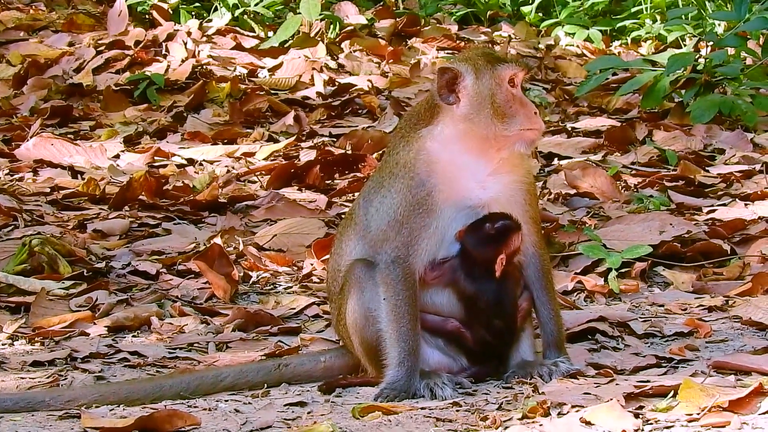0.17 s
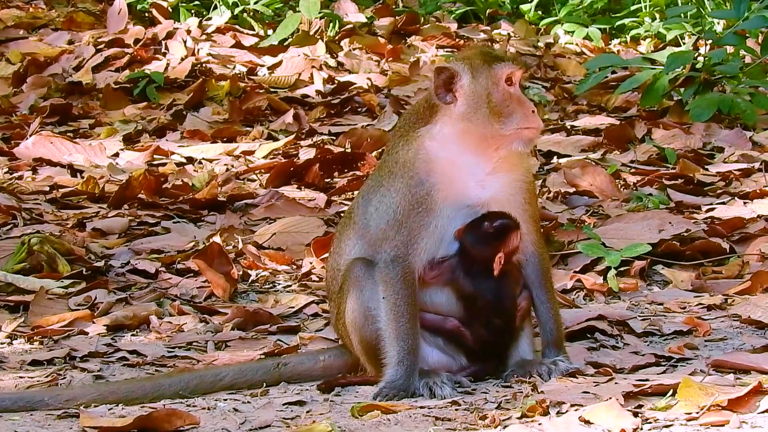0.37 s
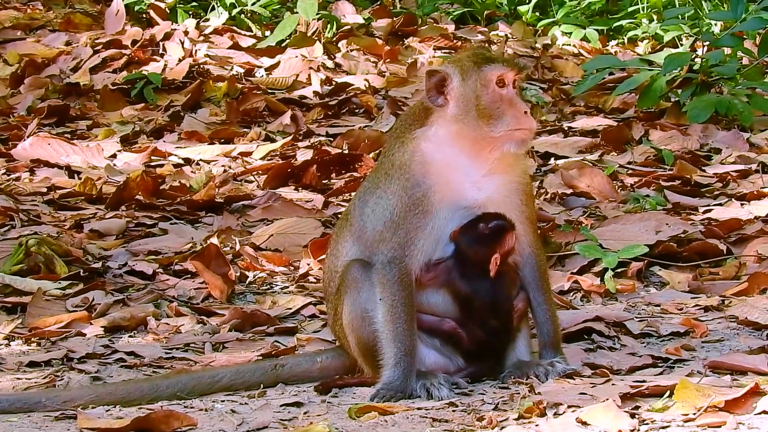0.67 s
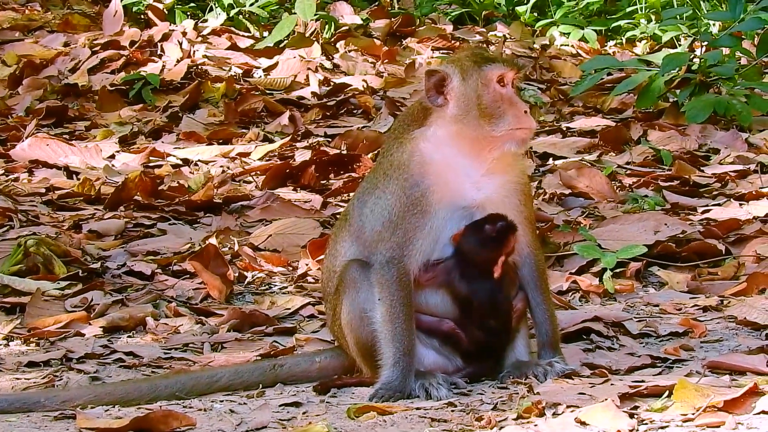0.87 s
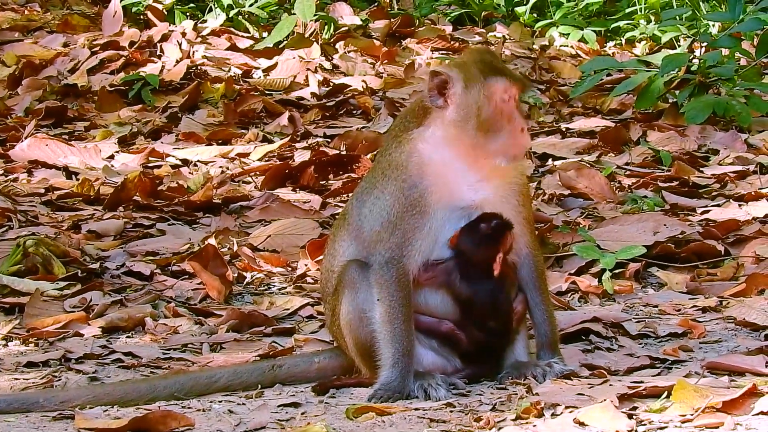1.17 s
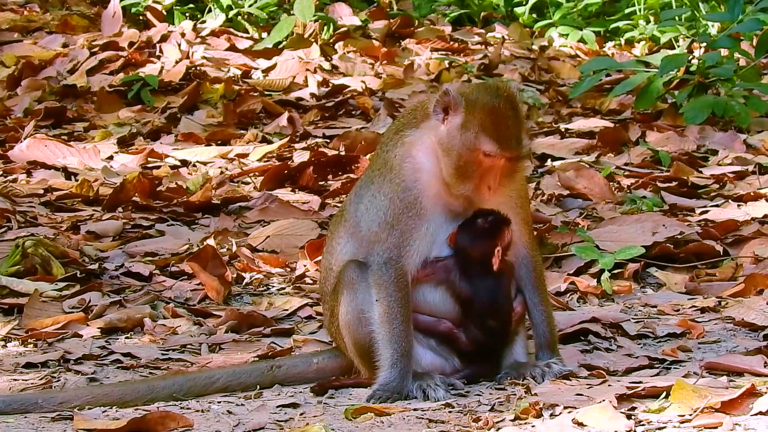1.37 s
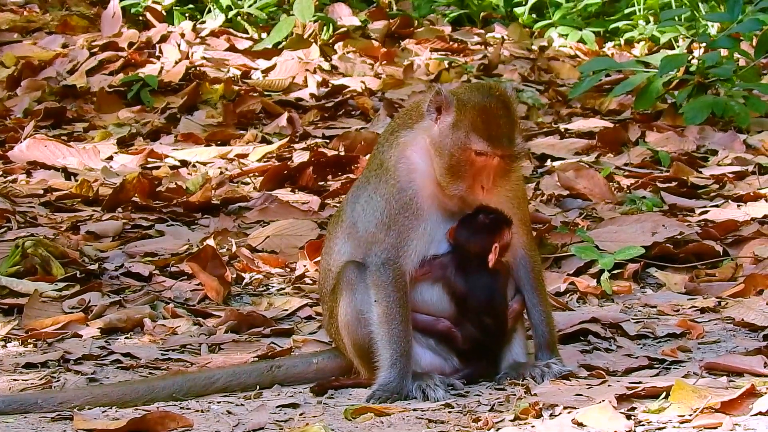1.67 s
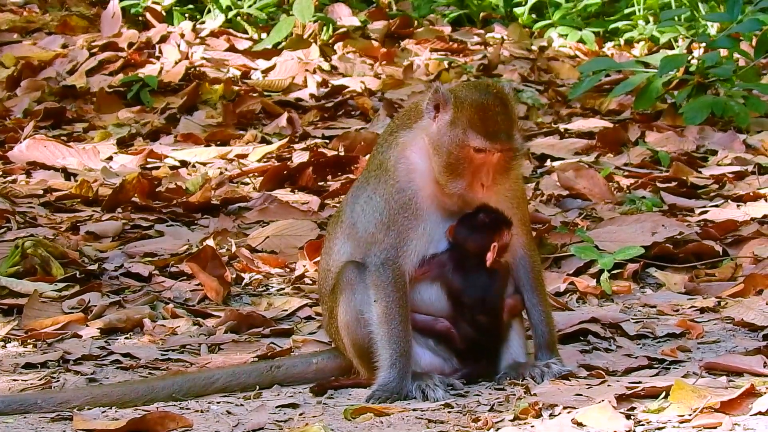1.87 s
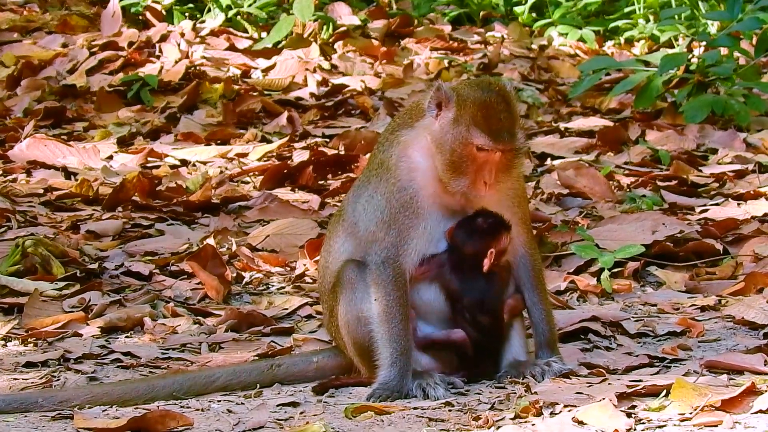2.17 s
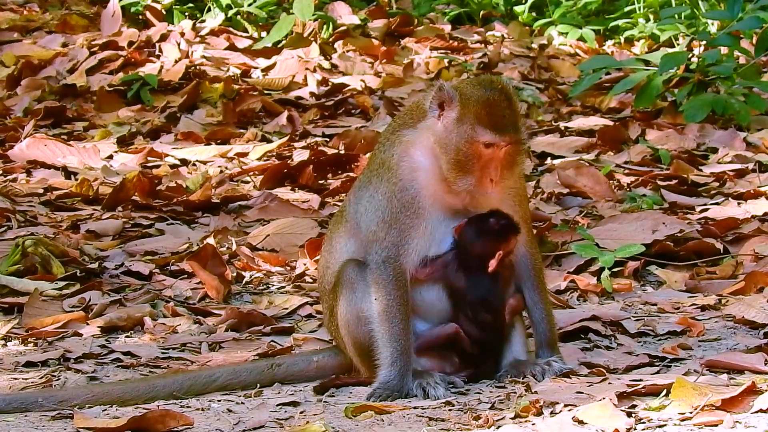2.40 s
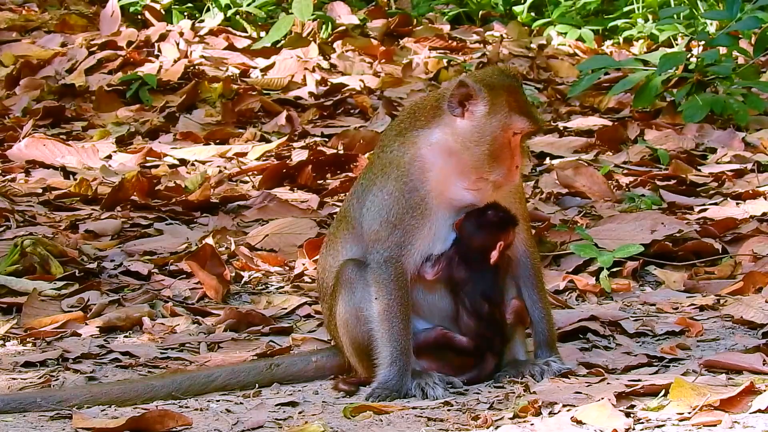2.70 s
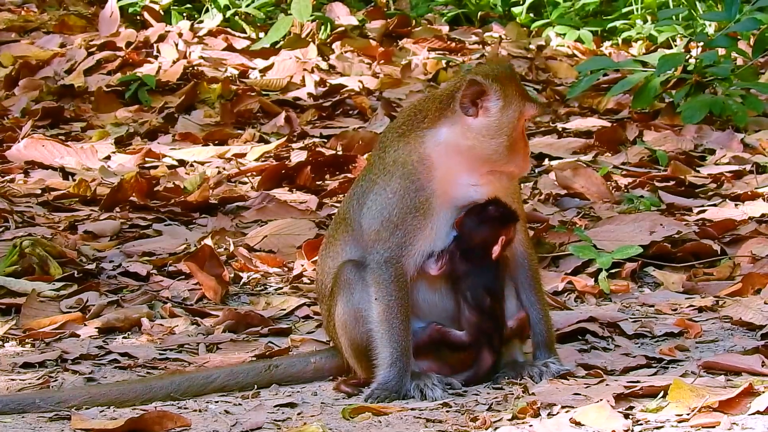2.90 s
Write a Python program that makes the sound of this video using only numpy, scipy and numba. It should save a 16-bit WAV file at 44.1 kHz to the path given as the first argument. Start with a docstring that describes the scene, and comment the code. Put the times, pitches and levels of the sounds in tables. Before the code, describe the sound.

Cicadas sing a steady, high, buzzing chorus at a forest edge as a vehicle slowly nears.

```python
"""At a forest edge, a cicada chorus sings: near singers around one pitch, far ones spread a little below it.
Each singer repeats one stored drum cycle; a faint cricket is wing clicks ringing one resonance.
A distant one-cylinder engine idles as single firings through a pipe; a vehicle of shaped noise nears on the left.
Dry leaves tick as short noise cracks, soft falling sine tones hum now and then, and quiet noise is the air."""
import sys
import numpy as np
from scipy import signal
from scipy.fft import rfft, irfft, next_fast_len
from scipy.io import wavfile
from scipy.ndimage import uniform_filter1d
from numba import njit

SR = 44100
rng = np.random.default_rng(int(sys.argv[2]) if len(sys.argv) > 2 else 0)


def to_linear_factor(level_db):
    """Convert decibel levels (scalar or array-like) to linear amplitude factors."""
    exponent = np.asarray(level_db, float) / 20
    return 10 ** exponent


def to_wav(s):
    """Save 16-bit WAV."""
    ch = np.atleast_2d(s).T  # columns
    pcm = np.round(np.clip(ch, -1, 1) * 32767)  # PCM
    wavfile.write(sys.argv[1], SR, pcm.astype(np.int16))


N = 134505  # length in samples, about 3 s


def level(x, db):
    """Scale a sound to an rms level in dB."""
    return x * to_linear_factor(db) / np.sqrt(np.mean(x ** 2))


def shape(table, hz):
    """Read the gain at each frequency from a (Hz, dB) table, on a log frequency axis."""
    table_hz, table_db = np.array(table, float).T
    return to_linear_factor(np.interp(np.log(hz + 1), np.log(table_hz), table_db))


def pan(db):
    """Left and right gains that make the left louder than the right by db."""
    return to_linear_factor(np.array([[db / 2], [-db / 2]]))


def walk(rate):
    """Smooth random wander of rms 1, drawn through `rate` random points per second."""
    knots = np.arange(0, N + SR / rate, SR / rate)
    heights = rng.standard_normal(4000)[:len(knots)]
    wander = np.interp(np.arange(N), knots, heights)
    wander = uniform_filter1d(wander, max(int(SR / rate), 2))
    return wander / np.sqrt(np.mean(wander ** 2))


@njit
def svf(x, hz, width):
    """Band-pass resonance whose centre may move; its gain at the centre is 1."""
    y, band, low = np.empty(len(x)), 0., 0.
    for i in range(len(x)):
        g, k = np.tan(np.pi * hz[i] / SR), width / hz[i]
        v = (band + g * (x[i] - low)) / (1 + g * (g + k))
        band, low, y[i] = 2 * v - band, low + 2 * g * v, k * v
    return y


def ring(x, hz, width):
    """Pass a sound through one resonance with a fixed centre and width in Hz."""
    return svf(x, np.full(len(x), float(hz)), float(width))


def pulses(rate, first_s, scatter_db):
    """One click each time a running phase completes a turn, with scattered sizes."""
    phase = np.cumsum(rate) / SR - first_s * rate[0]
    wraps = np.diff(np.floor(phase), prepend=-1)
    return wraps * to_linear_factor(scatter_db * rng.standard_normal(N))


def wash(table, flicker_db, rate):
    """Coloured stereo noise of rms 1 whose octaves each flicker on their own."""
    # how unlike the two channels are: (frequency [Hz], side minus mid level [dB])
    unlike = [(60, -28), (190, -26.5), (340, -15.5), (600, -16.5), (1900, -9.5), (3400, -5), (6000, -14),
              (10600, 9)]
    n = next_fast_len(N)
    f = np.arange(n // 2 + 1) * SR / n
    mid, side = rfft(rng.standard_normal((2, n))) * shape(table, f)
    pair = mid + side * shape(unlike, f) * np.array([[1], [-1]])
    out = 0
    for octave in range(int(np.log2(table[1][0])), int(np.log2(table[-2][0])) + 2):
        # neighbouring octaves crossfade smoothly
        share = np.cos(np.pi / 2 * np.clip(np.log2(f + 1) - octave, -1, 1)) ** 2
        out = out + irfft(pair * share, n)[:, :N] * to_linear_factor(flicker_db * walk(rate))
    return level(out, 0)


def forest_air():
    """Quiet background air: broad noise with a slight flicker."""
    # colour of the air noise: (frequency [Hz], relative level [dB per Hz])
    air_colour = [(30, -36), (60, -15), (110, -2), (200, -6), (400, -14), (700, -18.5), (1200, -20),
                  (2100, -23), (3000, -21.5), (3900, -29.5), (4600, -24), (6000, -16.5), (7000, -22),
                  (8500, -29.5), (9600, -46), (10700, -35), (11200, -62)]
    return to_linear_factor(-40) * wash(air_colour, flicker_db=0.4, rate=7.93)


def soft_tones(t):
    """Soft sine tones that swell and fade while the pitch falls, fast at first."""
    # soft tones: (start [s], length [s], start pitch [Hz], end pitch [Hz], rms level at mid-tone [dB])
    tones = [(.17, .25, 277, 262, -42), (.48, .3, 312, 243, -42), (2.45, .12, 245, 240, -38),
             (2.66, .34, 441, 438, -47), (2.78, .17, 200, 195, -38)]
    out = 0
    for start, length, from_hz, to_hz, db in tones:
        progress = np.clip((t - start) / length, 0, 1)
        hz = to_hz + (from_hz - to_hz) * (1 - progress) ** 2
        swell = np.sqrt(2 * np.sin(np.pi * progress).clip(0))
        out = out + to_linear_factor(db) * swell * np.sin(2 * np.pi * np.cumsum(hz) / SR)
    return out


def cricket():
    """Nearly regular wing clicks ring one resonance, twice over for steeper sides."""
    pitch_hz, width_hz, clicks_per_s = 3792, 300, 96.3
    clicks = pulses(clicks_per_s * (1 + .002 * walk(20)), first_s=.001, scatter_db=1.9)
    chirp = ring(ring(clicks, pitch_hz, width_hz), pitch_hz, width_hz)
    return level(chirp, -62.5) * to_linear_factor(1 * walk(3.37))  # the loudness wanders by 1 dB rms


def leaves(t):
    """Dry leaves tick: short decaying noise cracks through a resonance, louder on the left."""
    # leaf ticks: (time [s], peak level before panning [dB], centre [Hz], width of the first filter [Hz],
    # time for the noise to fall 60 dB [s])
    ticks = [(.6164, -33, 1900, 500, .025), (.6166, -34, 950, 350, .05), (.6168, -34, 3300, 700, .015),
             (.6268, -18, 6300, 4000, .01), (.636, -34, 2400, 2500, .015), (.6422, -26, 5500, 3000, .008),
             (.6445, -23, 6800, 5000, .012), (.648, -30, 4500, 1200, .025), (2.26, -44, 9000, 9000, .015),
             (2.4515, -24, 6900, 2000, .008), (2.4537, -19, 6000, 4000, .012),
             (2.4565, -30, 6200, 4000, .05), (2.7, -45, 9000, 9000, .015)]
    rise_s = .0005
    out, u = np.zeros(N), t[:4096]
    for start, db, hz, width, t60 in ticks:
        decay = np.exp(-np.log(1000) * u / t60)
        rise = 1 - np.exp(-u / rise_s)
        crack = rng.standard_normal(len(u)) * decay * rise
        for filter_width in (width, 2 * width, 2 * width):
            crack = ring(crack, hz, filter_width)
        out[int(start * SR):][:len(u)] += to_linear_factor(db) * crack / np.abs(crack).max()
    return out * pan(8)


def engine(t):
    """One-cylinder idle: slow single firings thump through the pipe resonances."""
    # idling speed: (time [s], firings per second [Hz])
    idle = [(0, 12.2), (.38, 10.6), (.6, 12.3), (.85, 11.5), (3.05, 11.65)]
    # pipe resonances: (centre [Hz], width of the first filter [Hz], relative level [dB])
    pipe = [(65.5, 15, -7.5), (110.2, 30, -1), (196, 23, -10), (333.8, 30, -7)]
    fired = pulses(np.interp(t, *np.array(idle).T), first_s=.038, scatter_db=2)
    thump = 0
    for k, (hz, width, db) in enumerate(pipe):
        tone = ring(ring(fired, hz, width), hz, 2 * width)
        thump = thump + (-1) ** k * level(tone, db)  # neighbours have opposite signs
    return level(thump, -39)


def vehicle(t):
    """Motor rumble and tyre roar swell as it nears; two peaks in the roar move in pitch."""
    # approach: (time [s], rumble gain [dB], tyre gain [dB], low roar peak [Hz], high roar peak [Hz])
    approach = [(0, -42, -55.5, 750, 900), (.55, -41, -51, 744, 930), (1.1, -39, -49, 770.4, 900),
                (1.5, -39.5, -44, 721.5, 920), (1.85, -37, -40.5, 700, 960), (2.1, -33, -39.5, 680, 990),
                (2.35, -33, -40.5, 660, 1100), (2.55, -31, -42.5, 710, 1120), (2.75, -29, -38.5, 916, 1440),
                (2.88, -30, -40.5, 770, 1340), (3.05, -29, -40, 725, 1010)]
    # colour of the motor rumble: (frequency [Hz], relative level [dB per Hz])
    rumble_colour = [(24, -48), (40, -19.5), (97, -2.5), (189, -1), (333, -9.5), (364, -16), (437, -10.5),
                     (506, -15), (600, -19.5), (780, -65), (1320, -120)]
    # colour of the tyre noise: (frequency [Hz], relative level [dB per Hz])
    tyre_colour = [(240, -28), (400, -6), (497, -9), (632, -1.5), (899, -2), (1380, -7), (1920, -15),
                   (2400, -11.5), (3120, -51), (5280, -120)]
    s, rumble_db, tyre_db, low_hz, high_hz = np.array(approach, float).T
    low_peak = svf(rng.standard_normal(N), np.interp(t, s, low_hz), 91.)
    high_peak = svf(rng.standard_normal(N), np.interp(t, s, high_hz), 250.)
    peaks = level(low_peak, -3) + level(high_peak, -3.5)
    tyres = wash(tyre_colour, flicker_db=0.73, rate=10) + peaks
    tyres = tyres * pan(4) * to_linear_factor(np.interp(t, s, tyre_db))
    rumble = wash(rumble_colour, flicker_db=2.4, rate=14) * to_linear_factor(np.interp(t, s, rumble_db))
    return tyres + rumble


@njit
def play(cycle, phase, lag, size):
    """Read one stored cycle at a running phase, a little apart at the two microphone ports."""
    out, n = np.empty((2, len(phase))), len(cycle)
    for i in range(len(phase)):
        out[0, i] = size[i] * cycle[int((phase[i] - lag + 1) * n) % n]
        out[1, i] = size[i] * cycle[int((phase[i] + lag + 1) * n) % n]
    return out


def cicadas(low, high, wobble, wobble_hz, rough, fade_db, db, count):
    """Each singer repeats its drum cycle at its own wavering rate and uneven strength, from its own direction."""
    # one cycle of the ribbed drum: (multiple of the cycle rate, relative level [dB])
    song = [(5, -7.5), (6, -30), (9, -24.5), (10, 1), (11, -13.5), (12, -19.5), (13, -25), (14, -19),
            (15, -9.5), (16, -26), (20, -34)]
    cycle_hz = 541.6  # before each singer's pitch ratio
    lag_us, lag_spread_us = 4.2, 51.3  # delay between the microphone ports
    throb_db, throb_hz, rough_hz = 2.2, 10.156, 501
    turn, out = np.arange(8192) / 8192, 0
    places = np.linspace(0, 1, count)  # from lowest to highest pitch
    sides = rng.permutation(np.linspace(-1, 1, count))
    for place, side in zip(places, sides):
        cycle = sum(to_linear_factor(g) * np.cos(2 * np.pi * (k * turn + rng.random())) for k, g in song)
        ratio = low + (high - low) * place
        phase = np.cumsum(cycle_hz * ratio * (1 + wobble * walk(wobble_hz))) / SR
        lag = cycle_hz * (lag_us + lag_spread_us * side) / 2e6  # half the delay, in cycles
        throb = to_linear_factor(throb_db * walk(throb_hz) - fade_db * (1 - place))  # lower singers are fainter
        size = throb * (1 + rough * walk(rough_hz))
        out = out + play(cycle, phase, lag, size) * pan(2 * side)
    return level(out, db)


def chorus():
    """Seven near singers close in pitch, and sixteen far ones spread below them."""
    # singers' pitch: (lowest ratio, highest ratio, wobble share, wobble points per second [Hz], roughness share)
    near_pitch = (.995, 1.007, .0015, 30, .36)
    far_pitch = (.905, .993, .005, 150, .35)
    # singers' loudness: (lowest singer fainter by [dB], level of the group [dB])
    near_loudness = (2.6, -30.5)
    far_loudness = (13.3, -34.5)
    near = cicadas(*near_pitch, *near_loudness, count=7)
    far = cicadas(*far_pitch, *far_loudness, count=16)
    return near + far


def scene():
    """All sources added together over the forest air."""
    t = np.arange(N) / SR
    background = forest_air() + soft_tones(t) + cricket() + leaves(t)
    return background + engine(t) + vehicle(t) + chorus()


def band_limit(x):
    """A steep low-pass at the top of the band."""
    return signal.sosfilt(signal.butter(12, 11200, fs=SR, output="sos"), x)


def record(dry):
    """The microphone rolls off the top steeply above 10900 Hz."""
    top_filter = signal.cheby1(6, .5, 10900, fs=SR, output="sos")
    mix = signal.sosfilt(top_filter, dry)
    return band_limit(mix)


dry = scene()
out = record(dry)
to_wav(out)
```